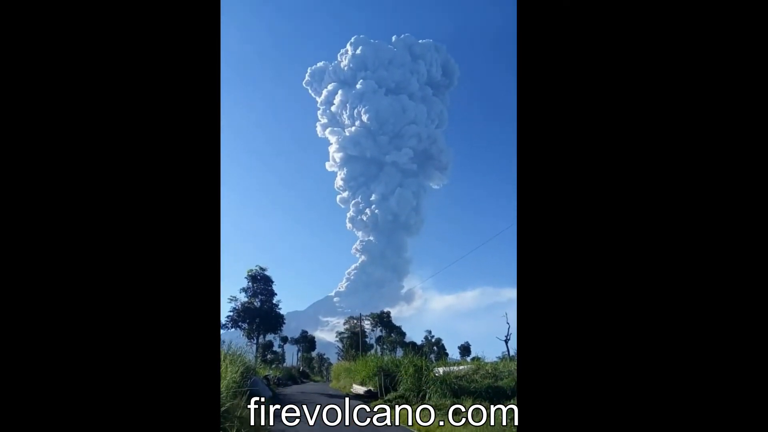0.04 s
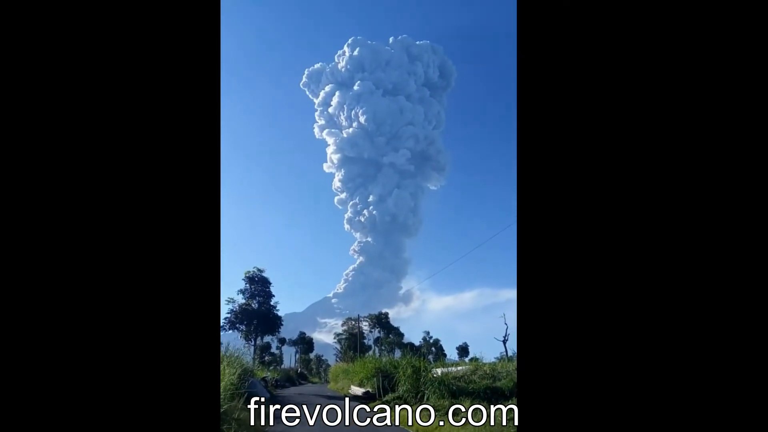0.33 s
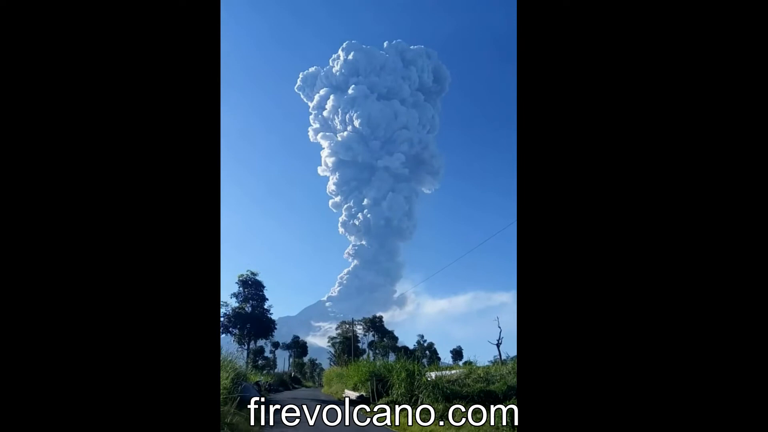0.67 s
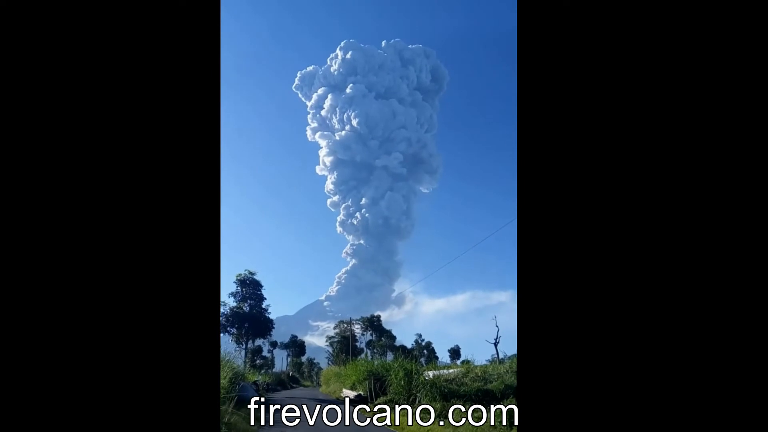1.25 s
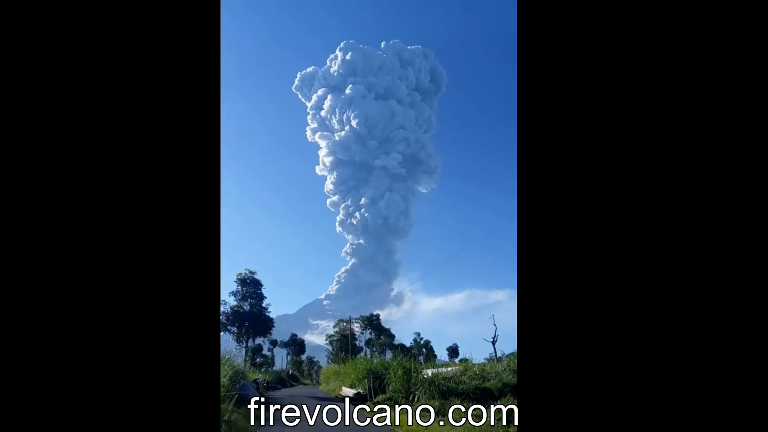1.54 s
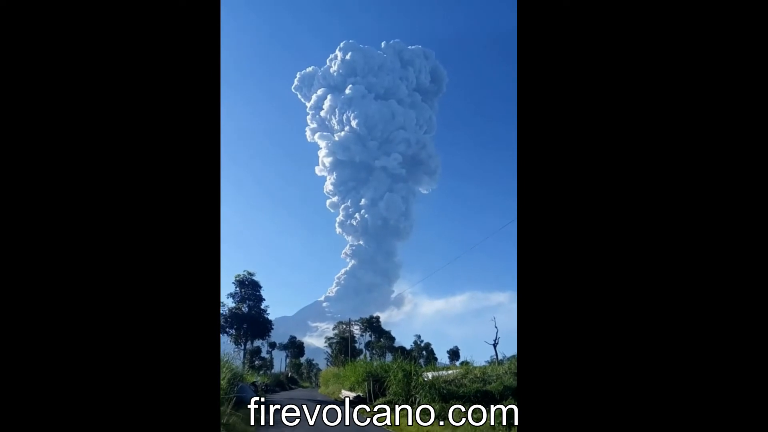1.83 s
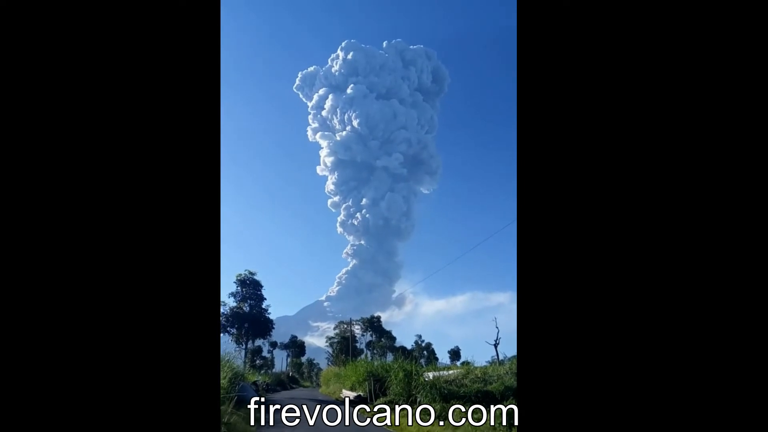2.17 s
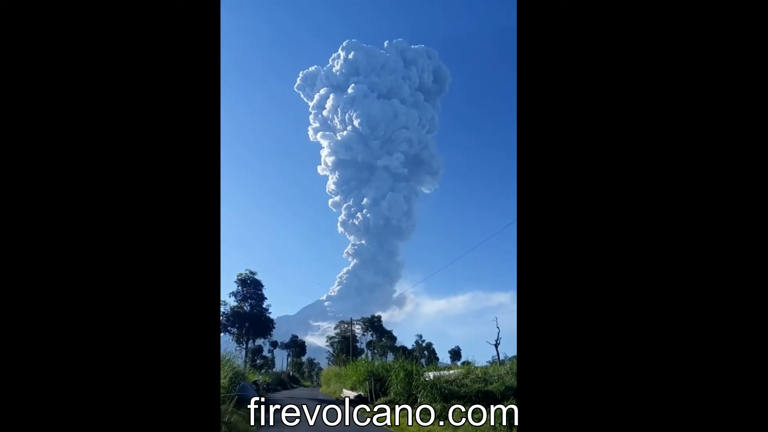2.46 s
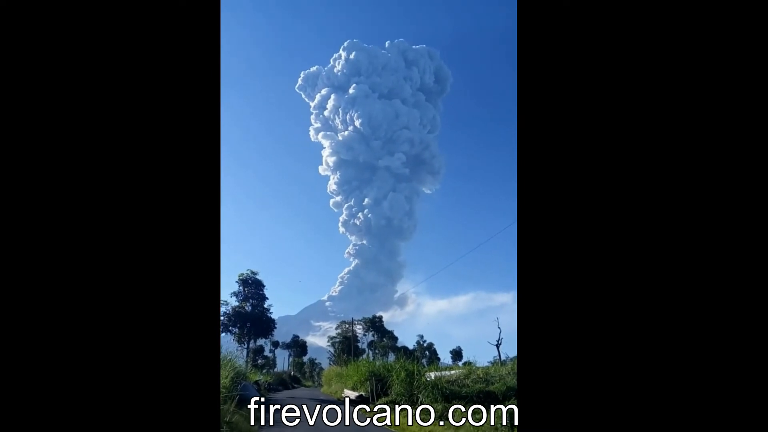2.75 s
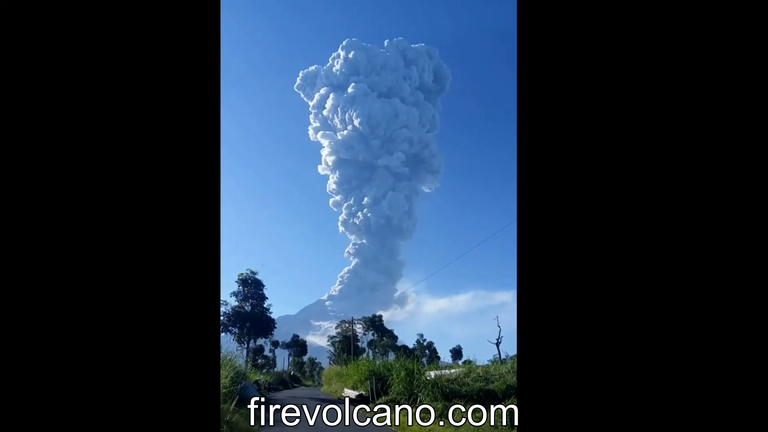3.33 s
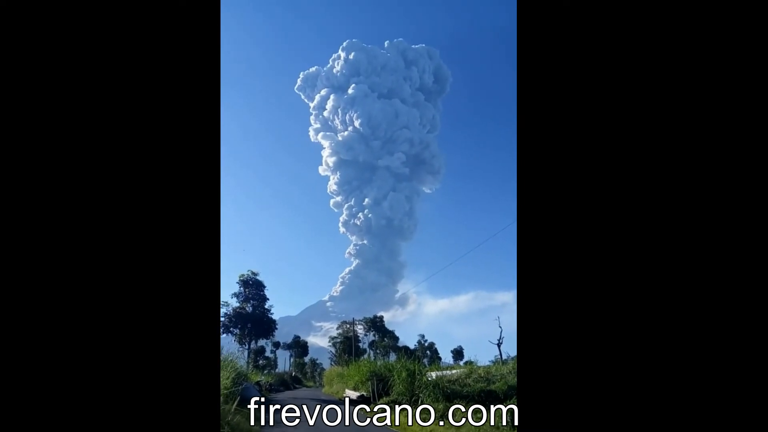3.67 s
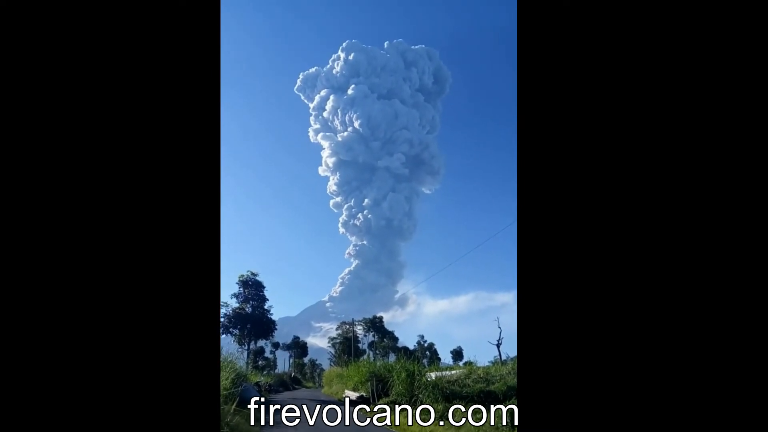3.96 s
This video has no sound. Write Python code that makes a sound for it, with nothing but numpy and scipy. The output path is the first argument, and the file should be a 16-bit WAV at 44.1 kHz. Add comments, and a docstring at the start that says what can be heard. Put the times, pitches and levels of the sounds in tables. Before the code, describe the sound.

A small vehicle, likely a motorbike, rolls past from right to left on a country road, its tyres hissing and crunching on grit, its engine humming quietly. It fades while wind keeps rumbling on the microphone over faint insects.

```python
"""A gritty country road: a small vehicle, likely a motorbike, rolls past from right to left.
Its tyres roar and hiss as the tread meets the road, crunch over some grit and fade with distance.
Its engine hums quietly, a series of partials that drops in pitch as it passes and slows.
Wind eddies rumble on the microphone and let up for an instant halfway through.
A thin band of insect song lies behind, with a few faint rustles close by."""
import sys
import numpy as np
from scipy import signal
from scipy.fft import rfft, irfft
from scipy.io import wavfile
from scipy.ndimage import uniform_filter1d

SR = 44100
rng = np.random.default_rng(int(sys.argv[2]) if len(sys.argv) > 2 else 0)


def transcribe(u):
    """Save the signal u as a 16-bit wav file named by the first command-line argument.

    u: samples, shape (n,) or (channels, n), limited to [-1, 1]; the rate is SR.
    q: integer samples, one column per channel.
    """
    v = np.clip(np.atleast_2d(u).T, -1, 1)
    q = np.round(v * 32767).astype(np.int16)
    wavfile.write(sys.argv[1], SR, q)


N = 176400
TIME = np.arange(N) / SR
SIZE, HOP = 1024, 256  # short-time spectra: frame length and step in samples
FRAME_S = np.arange(N // HOP + 5)[:, None] * HOP / SR
BIN_HZ = np.fft.rfftfreq(SIZE, 1 / SR)


def amp(db):
    """Decibels to amplitude ratio."""
    return 10 ** (np.asarray(db) / 20)


def unit(x):
    """Normalisation to rms 1."""
    return x / np.sqrt(np.mean(abs(x) ** 2) + 1e-20)


def at_hz(points, hz):
    """Interpolation of a spectrum on a log-frequency axis."""
    f, value = np.transpose(points)
    return np.interp(np.log(hz + 1), np.log(f + 1), value)


def at_time(points, t):
    """Linear interpolation in time."""
    return np.interp(t, *np.transpose(points))


def noise(spectrum, channels=2):
    """Spectral shaping of white noise: independent channels, rms 1."""
    gain = amp(at_hz(spectrum, np.fft.rfftfreq(N, 1 / SR)))
    return unit(irfft(rfft(rng.standard_normal((channels, N))) * gain, N))


def wander(rate_hz):
    """Random modulation: low-passed noise of rms 1."""
    hz = np.fft.rfftfreq(N, 1 / SR)
    return unit(irfft(rfft(rng.standard_normal(N)) * (hz > 0) / (1 + (hz / rate_hz) ** 4), N))


def panned(db):
    """Level-difference panning: two gains, left over right by db."""
    return amp(np.array([db / 2, -db / 2]))


# Spectrum of insects and distant air: frequency_hz, relative_db
INSECT_SPECTRUM = [(150, -17), (450, 5), (950, -3), (1700, -16), (2300, -10), (3300, -11.5), (4400, -12.5),
                   (4750, -3), (5000, 0.5), (5400, -3.5), (5950, -6.5), (6600, -10.5), (8500, -22.5),
                   (12500, -16.5), (15500, -38)]


def insects(level_db=-51.5):
    """Incoherent summation: a far chorus merges into a steady band near 5 kHz over faint air."""
    return noise(INSECT_SPECTRUM) * amp(level_db + .5 * wander(rate_hz=70))


# Faint rustles: centre_s, level_db, half_length_s
RUSTLE_EVENTS = [(2.016, -53, 0.0081), (3.356, -53.5, .014), (3.443, -50, 0.021)]
# Spectrum of a rustle: frequency_hz, relative_db
RUSTLE_SPECTRUM = [(400, -9), (1500, -1), (4000, -2), (6300, 4.5), (8500, -14), (12500, -7), (15500, -19)]


def rustles():
    """Amplitude modulation: bell-shaped envelopes on fluttering noise give soft, close swishes."""
    envelope = sum(amp(db) * np.exp(-.5 * ((TIME - centre_s) / half_s) ** 2)
                   for centre_s, db, half_s in RUSTLE_EVENTS)
    flutter = noise(RUSTLE_SPECTRUM) * amp(3.9 * wander(rate_hz=180))
    return flutter * envelope * panned(db=6.5)[:, None]


# Spectrum of wind on the microphone: frequency_hz, relative_db
WIND_SPECTRUM = [(8.8, -62), (15, -37), (22, -49), (30, -29), (42, -5.5), (81, 0.5), (133, -3.5),
                 (185, -11.5), (292, -16), (332, -18), (667, -31), (847, -35.5), (1200, -47.5), (1560, -52),
                 (2640, -120)]
# Strength of the wind: time_s, level_db
WIND_LEVEL = [(0, -22.5), (.6, -23), (.85, -22.5), (1.25, -23.5), (1.6, -23.5), (2.2, -25), (2.45, -25),
              (2.8, -24.5), (3.3, -22.5), (4, -24)]


def wind(buffet_db=0.5, ceiling_rms=3.4, lull_s=2.057, lull_half_s=0.037, lull_db=-14.5):
    """Turbulent pressure: eddies buffet the microphone with a softly limited, centred rumble."""
    eddies = noise(WIND_SPECTRUM, channels=1) * amp(buffet_db * wander(rate_hz=24))
    rumble = unit(np.tanh(unit(eddies) / ceiling_rms))
    lull = lull_db * np.exp(-((TIME - lull_s) / lull_half_s) ** 4)
    return rumble * amp(at_time(WIND_LEVEL, TIME) + lull)


CROSSING_S = 0.52  # the low sounds cross the centre


def bass_delay_ms(t, limit_ms=0.28, swing_s=.3):
    """Path difference: low sounds reach the left microphone late, then early after the crossing."""
    return limit_ms * np.tanh((CROSSING_S - t) / swing_s)


# Engine partials: crank_multiple, coming_db, going_db
ENGINE_ORDERS = [(2.5, -39, -45), (3, -44, -28), (3.5, -62, -42.5), (4, -41, -31.5), (5, -33, -40),
                 (6, -31.5, -42.5), (7, -43, -47), (8, -48, -54), (9, -50, -50), (9.5, -42, -61)]
# Crank speed: time_s, rotation_hz
CRANK_SPEED = [(0, 32.5), (.3, 34.3), (.6, 32.2), (.88, 30.7), (1.3, 32.3), (1.9, 31.5), (2.6, 29.7),
               (3.4, 28.4), (4, 26.5)]
# Gain on all partials: time_s, gain_db
ENGINE_GAIN = [(0, -1), (.3, -2.5), (.6, -5), (.9, -2), (1.3, -2.5), (1.8, -9), (2.6, -9.5), (3.4, -11.5),
               (4, -23)]


def engine(uneven_db=1.8, stereo_width=1.44):
    """Engine orders: partials follow the slowing crank, and lower ones dominate after the pass."""
    passed = .5 + .5 * np.tanh((TIME - CROSSING_S) / 0.27)
    crank_hz = at_time(CRANK_SPEED, TIME) * (1 + .01 * wander(rate_hz=12))
    delay_s = np.array([[1], [0]]) * stereo_width * bass_delay_ms(TIME) / 1000  # left only
    turns = np.cumsum(crank_hz) / SR - crank_hz * delay_s
    hum = np.zeros((2, N))
    for order, coming_db, going_db in ENGINE_ORDERS:
        level_db = coming_db + (going_db - coming_db) * passed + uneven_db * wander(rate_hz=6.1)
        hum += amp(level_db) * np.sin(2 * np.pi * (order * turns + rng.random()))
    return np.sqrt(2) * hum * amp(at_time(ENGINE_GAIN, TIME))


# Stones under the tyres: start_s, gain_db, decay_s, left_minus_right_db
GRIT_CRUNCHES = [(.185, -24, 0.0049, -6), (0.239, -23, .007, 1), (.725, -30, 0.011, 4),
                 (0.787, -14, 0.0095, 3), (.851, -29, .012, 4)]
# Spectrum of cracking grit: frequency_hz, relative_db
GRIT_SPECTRUM = [(100, -50), (600, -14), (2200, -7), (3700, 4.5), (5200, -3), (7200, 2.5), (9200, -4),
                 (12500, 1.5), (15500, -2.5)]


def grit(attack_s=0.0055, tail_db=-23, tail_decay_s=0.037):
    """Brittle fracture: stones crack under the tread in bursts with a short scattered tail."""
    crackle = noise(GRIT_SPECTRUM) * amp(2.0 * wander(rate_hz=900))
    crunches = np.zeros((2, N))
    for start_s, db, decay_s, pan_db in GRIT_CRUNCHES:
        age_s = np.maximum(TIME - start_s, 0)
        attack = np.minimum(age_s / attack_s, 1) ** 2
        decay = np.exp(-age_s / decay_s) + amp(tail_db) * np.exp(-age_s / tail_decay_s)
        crunches += crackle * attack * decay * amp(db) * panned(pan_db)[:, None]
    return crunches


# Tyre spectra when coming, alongside and going away: frequency_hz, relative_db
TREAD_COMING = [(300, 10), (550, 2), (1100, 11), (1650, 0.5), (2200, 6), (2950, 6), (4200, 2.5),
                (5500, 0.5), (8500, -15.5), (10500, -12.5), (12000, -7), (15000, -11)]
TREAD_ALONGSIDE = [(300, 3), (500, 9), (750, 11.5), (1300, 13.5), (1800, 2), (2900, 5.5), (4200, 1.5),
                   (6200, -1.5), (8500, -12.5), (10500, -9.5), (12000, -4), (15000, -9)]
TREAD_GOING = [(300, 3.5), (700, 4.5), (1100, 10), (2200, 2), (3100, 3.5), (4500, 0.5), (6500, 0),
               (8500, -9), (10500, -6), (12500, -0.5), (15000, -7)]
# Boost or cut of the tread roar near 1 kHz: time_s, gain_db
ROAR_GAIN = [(0, 1), (.12, -4), (.17, 2), (.28, -2), (.42, 0), (.57, -1.5), (.7, -5), (1.2, 0.5)]


def tread_colour_db():
    """Directivity and absorption: the tyre spectrum changes with angle and dulls with distance."""
    alongside_s, coming_fade_s, going_fade_s = 0.3978, 0.29, 0.45
    coming = np.clip((alongside_s - FRAME_S) / coming_fade_s, 0, 1)
    going = np.clip((FRAME_S - alongside_s) / going_fade_s, 0, 1)
    colour = coming * at_hz(TREAD_COMING, BIN_HZ) + going * at_hz(TREAD_GOING, BIN_HZ)
    colour += (1 - coming - going) * at_hz(TREAD_ALONGSIDE, BIN_HZ)
    roar_hz, roar_octaves = 1070, 0.58
    roar_band = np.exp(-.5 * (np.log2((BIN_HZ + 1) / roar_hz) / roar_octaves) ** 2)
    roar = at_time(ROAR_GAIN, FRAME_S) * roar_band
    swish_hz = 2630 + 4700 * FRAME_S  # a resonance that climbs on the approach
    swish_db, width_hz, end_s = 6, 180, .19
    swish = swish_db * np.exp(-.5 * ((BIN_HZ - swish_hz) / width_hz) ** 2 - (FRAME_S / end_s) ** 4)
    dulling = np.maximum(FRAME_S - 0.9, 0) * (BIN_HZ / 12000) ** 2  # 1 dB a second at 12 kHz
    bass_cut = at_hz([(30, -25), (200, 6)], BIN_HZ)
    return colour + roar + swish - dulling + bass_cut


# Level of the tyres: time_s, level_db
TYRE_LEVEL = [(0, -28), (.1, -24), (.22, -23), (.45, -24), (.6, -27.5), (.75, -28.5), (.95, -33),
              (1.2, -39), (1.5, -43), (2, -45.5), (2.6, -49), (3.3, -50), (4, -54.5)]
# Bearing of the hiss: time_s, left_delay_ms
HISS_DELAY = [(0, 0.3), (.22, 0.23), (.35, 0.1), (.55, 0.013), (.75, -0.039), (1.1, -0.095), (1.6, -0.12),
              (4, -0.19)]
# Balance with the vehicle on the right, then on the left: frequency_hz, left_minus_right_db
BALANCE_RIGHT = [(300, 1.5), (1100, -2.5), (2100, 5), (2900, -7), (4500, -2.5), (8000, -1), (12000, -6.5),
                 (15000, 3)]
BALANCE_LEFT = [(300, 0.5), (1000, 1), (1400, 0.5), (2300, 8.5), (3100, 3), (5000, 3.5), (7500, 2.5),
                (11500, 1), (14500, 11.5)]
# Direct sound common to both microphones: frequency_hz, amplitude_ratio
DIRECT_SHARE = [(200, 1), (700, 0.96), (1600, 0.73), (3000, 0.28), (8000, 0.38), (15000, 0)]


def tyres(patch_db=1.42, crossover_hz=3100):
    """Rolling noise: time and level differences carry the patchy tread roar from right to left."""
    draws = rng.standard_normal((5, len(FRAME_S), len(BIN_HZ)))
    right = draws[0] + 1j * draws[1]
    diffuse = draws[2] + 1j * draws[3]
    patches = uniform_filter1d(draws[4], size=20, axis=0)  # smooth in time
    patches = unit(uniform_filter1d(patches, size=4, axis=1))  # and in frequency
    colour = amp(tread_colour_db() + patch_db * patches)
    low = 1 / (1 + (BIN_HZ / crossover_hz) ** 8)
    delay_ms = low * bass_delay_ms(FRAME_S) + (1 - low) * at_time(HISS_DELAY, FRAME_S)
    delayed = right * np.exp(-2j * np.pi * BIN_HZ * delay_ms / 1000)
    direct = np.clip(at_hz(DIRECT_SHARE, BIN_HZ), 0, 1)
    left = direct * delayed + np.sqrt(1 - direct ** 2) * diffuse
    crossed = np.clip((FRAME_S - .17) / 0.34, 0, 1)
    balance_db = (1 - crossed) * at_hz(BALANCE_RIGHT, BIN_HZ) + crossed * at_hz(BALANCE_LEFT, BIN_HZ)
    spectra = np.array([left, right]) * colour * panned(balance_db)
    _, rolling = signal.istft(spectra.swapaxes(1, 2), nperseg=SIZE, noverlap=SIZE - HOP)
    level_db = at_time(TYRE_LEVEL, TIME) + .5 * wander(rate_hz=30)
    return unit(rolling[:, :N]) * amp(level_db)


def scene():
    """Superposition of the wind, the passing vehicle and the countryside."""
    return wind() + tyres() + engine() + grit() + rustles() + insects()


def record(dry):
    """Band limiting: a linear-phase low-pass removes the highest treble."""
    cutoff_hz = 15650
    lowpass = signal.firwin(1023, cutoff_hz, window=("kaiser", 9), fs=SR)
    return signal.oaconvolve(dry, lowpass[None], "same")


dry = scene()
out = record(dry)
transcribe(out)
```